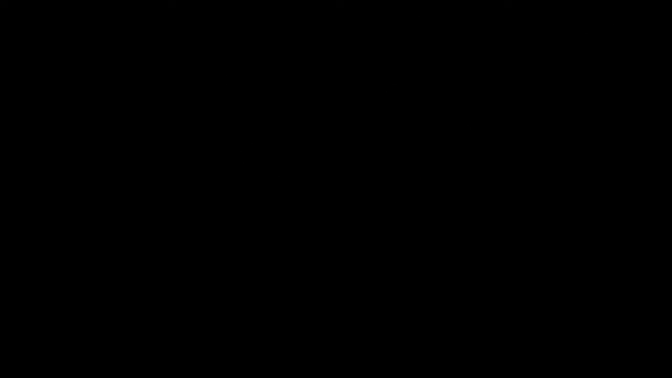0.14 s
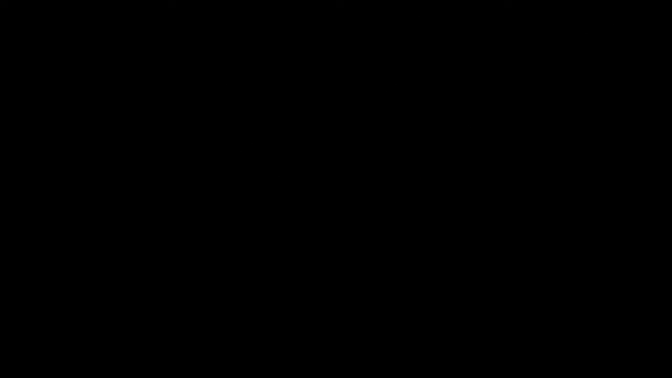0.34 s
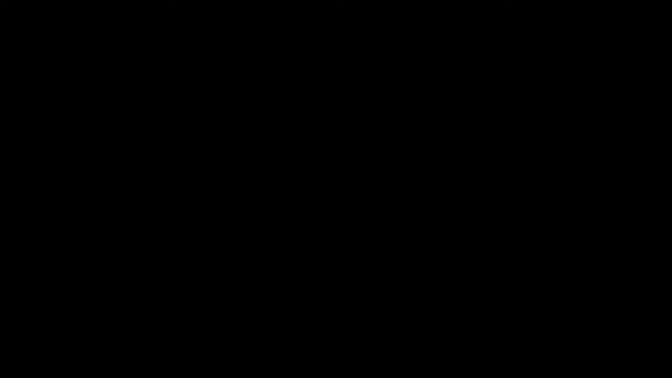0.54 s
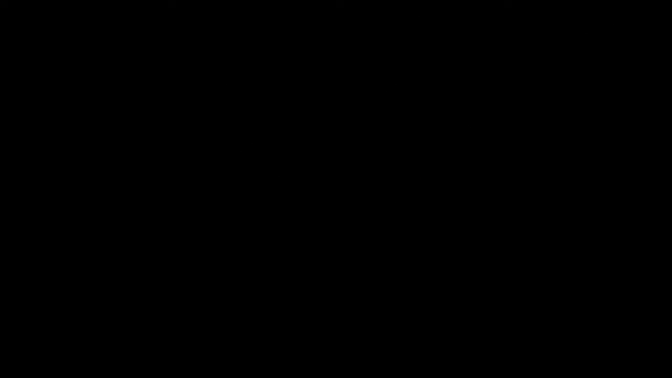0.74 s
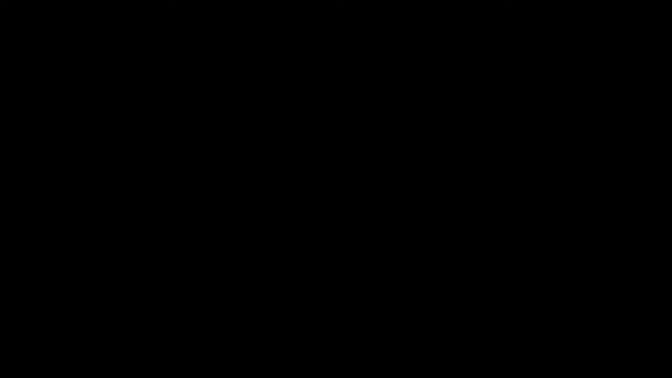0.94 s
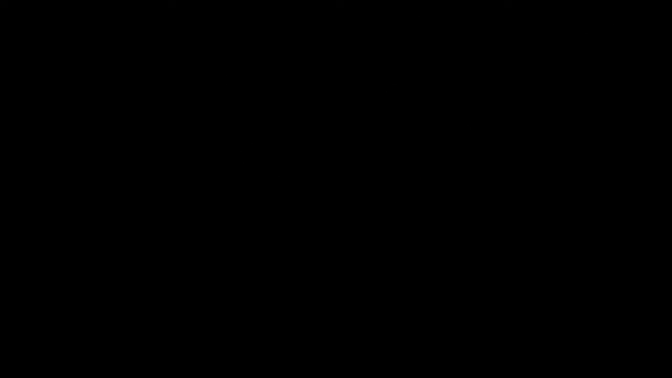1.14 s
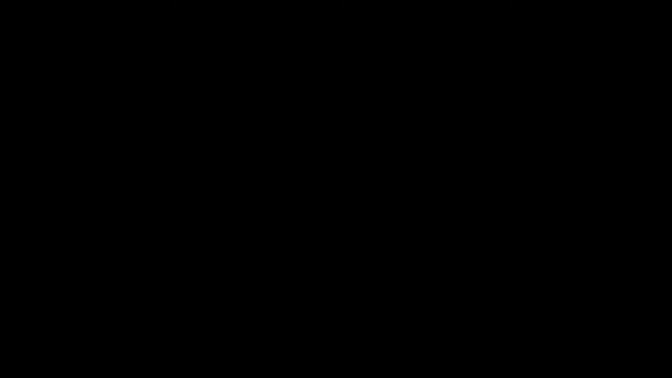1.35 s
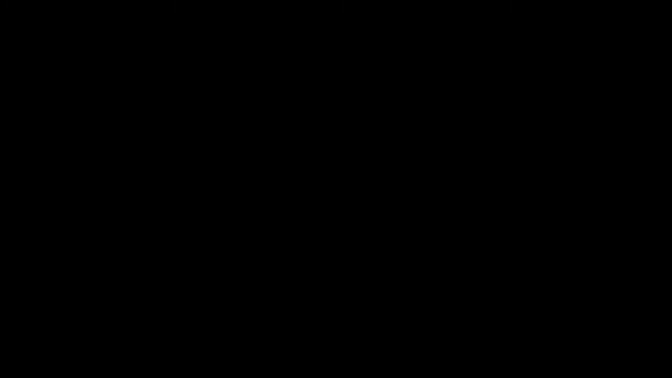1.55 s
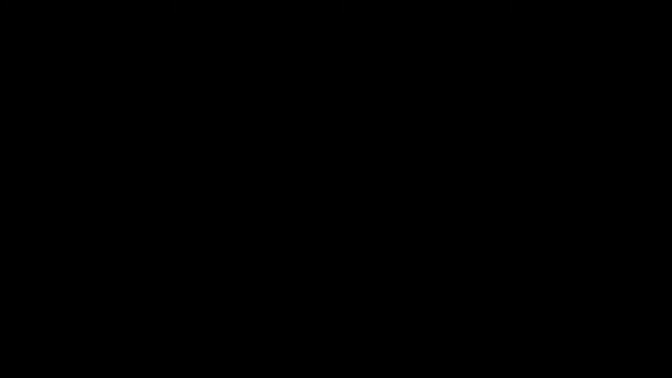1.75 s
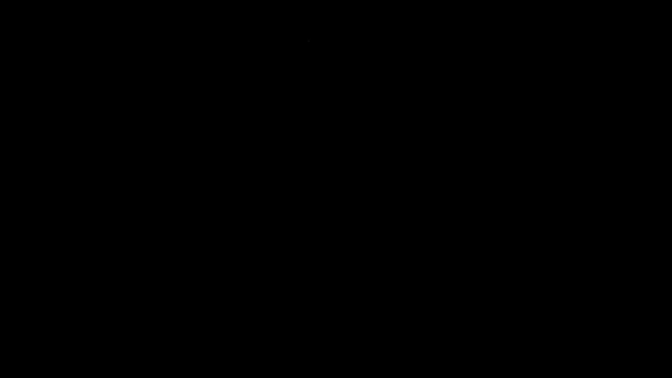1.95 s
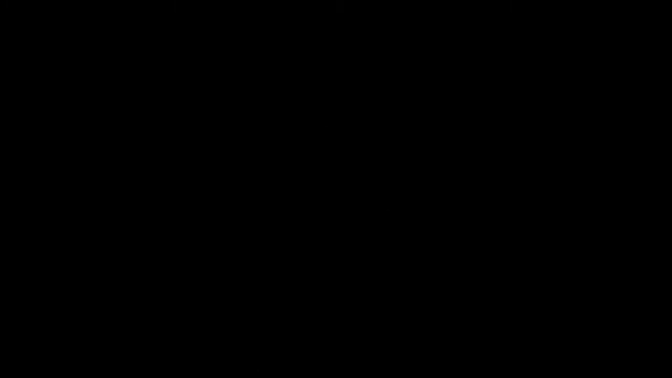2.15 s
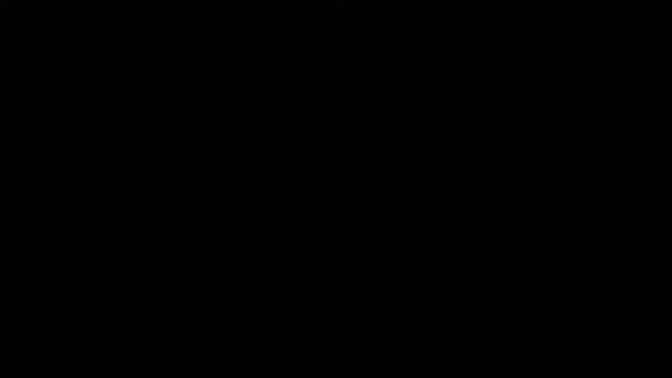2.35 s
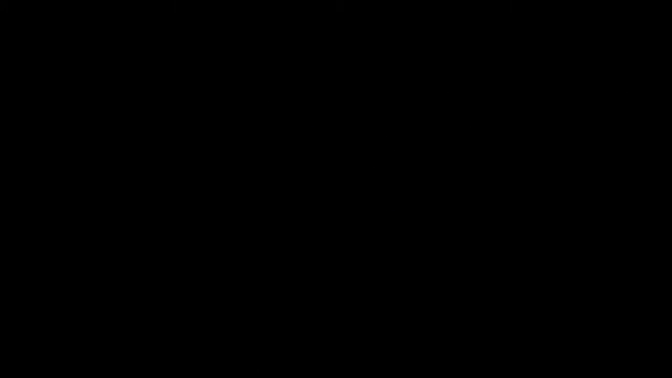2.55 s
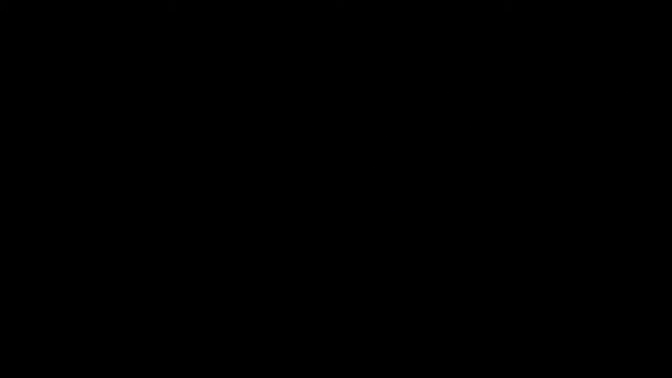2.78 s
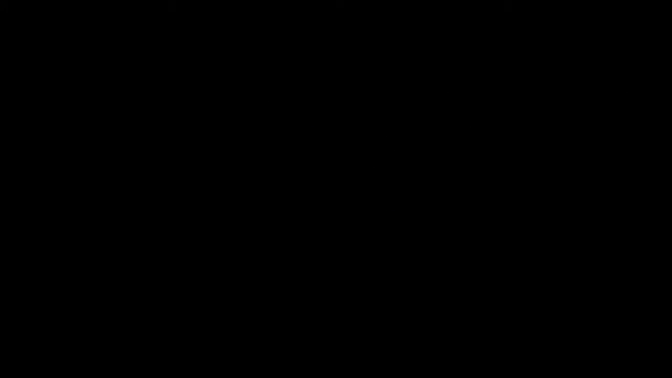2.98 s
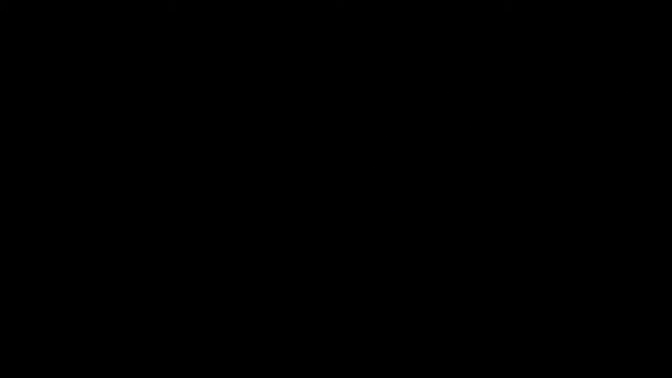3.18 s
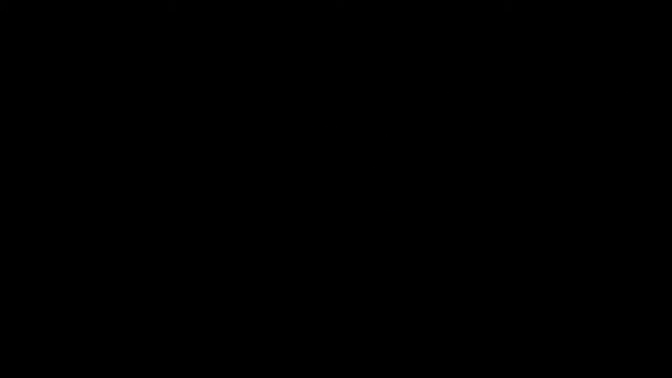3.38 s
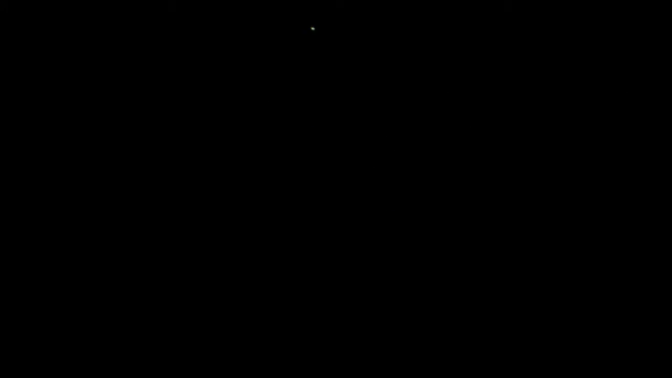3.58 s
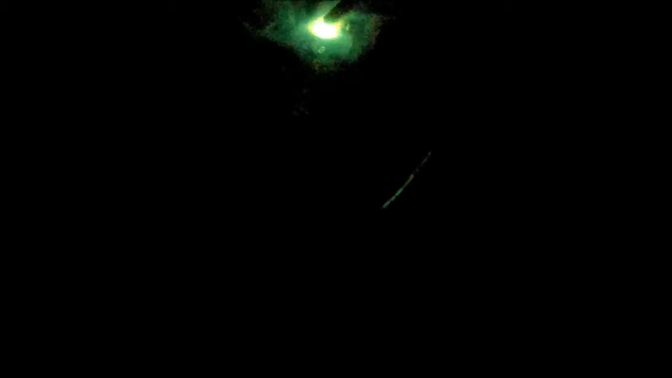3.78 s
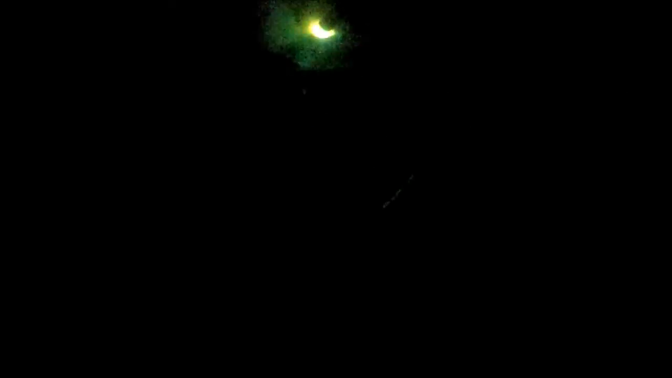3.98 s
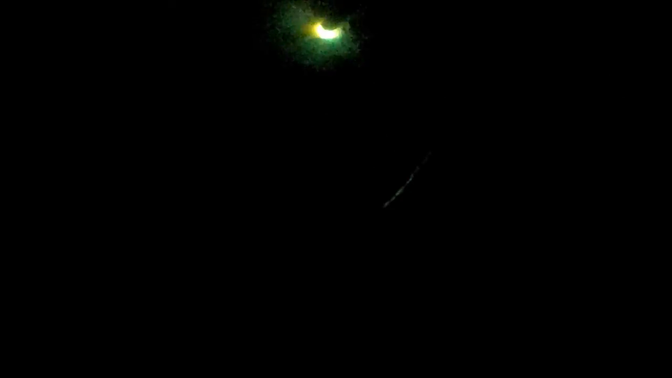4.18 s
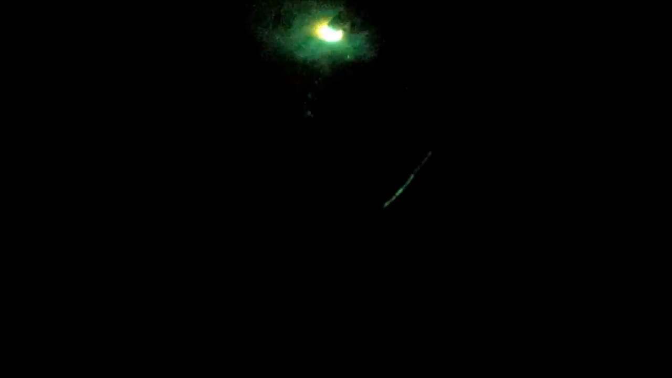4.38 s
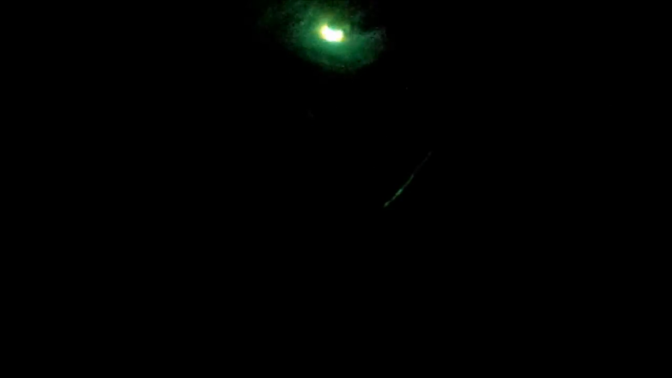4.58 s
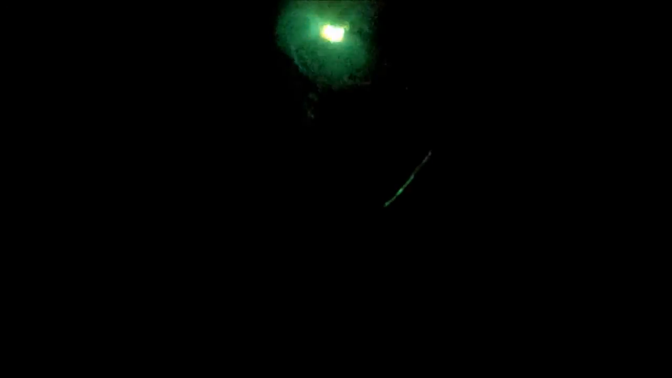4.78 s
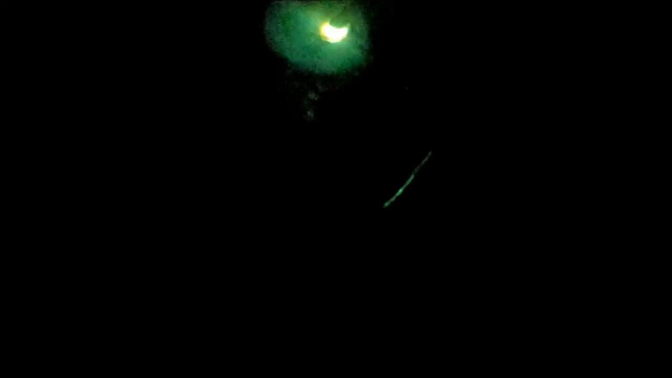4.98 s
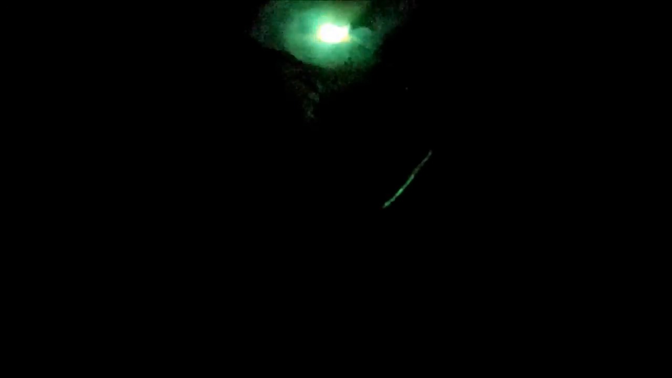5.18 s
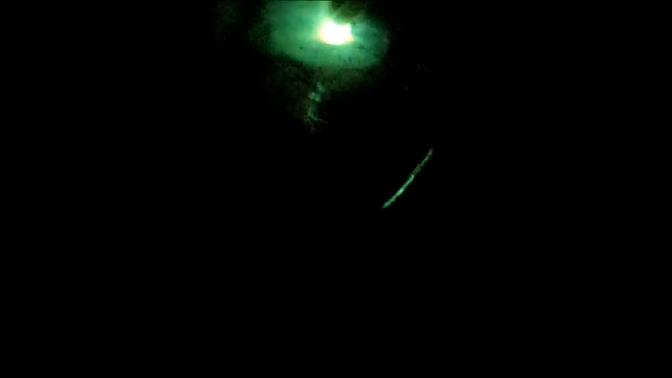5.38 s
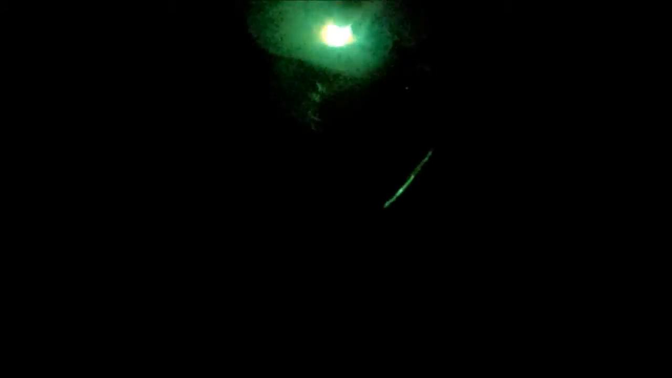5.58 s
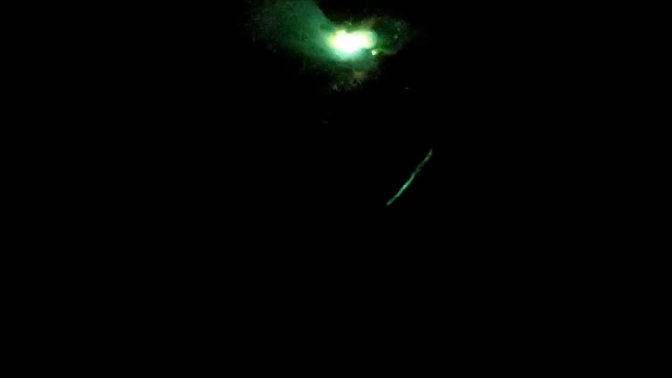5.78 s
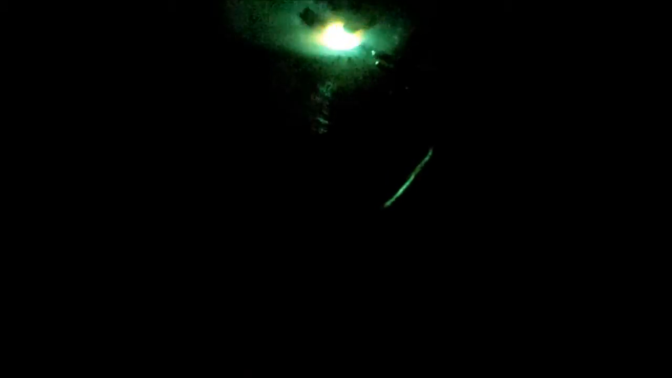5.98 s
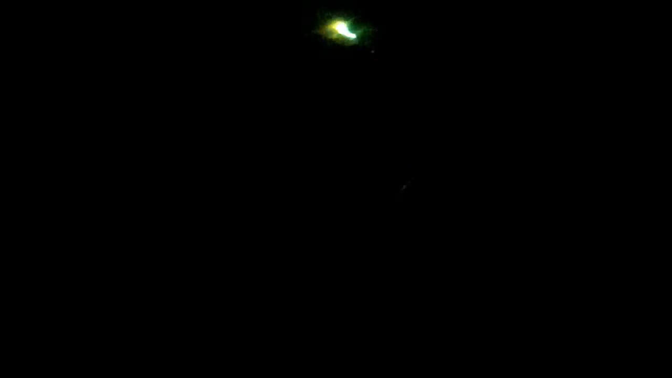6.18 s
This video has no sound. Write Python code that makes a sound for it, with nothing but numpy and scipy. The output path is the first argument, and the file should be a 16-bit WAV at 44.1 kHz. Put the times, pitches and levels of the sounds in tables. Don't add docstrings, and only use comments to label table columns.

```python
import sys
import numpy as np
from scipy import signal
from scipy.fft import rfft, irfft
from scipy.io import wavfile
from scipy.ndimage import uniform_filter1d

SR = 44100
rng = np.random.default_rng(int(sys.argv[2]) if len(sys.argv) > 2 else 0)


def linear_from_db(decibels):
    return 10 ** (np.asarray(decibels, float) / 20)


def output_pcm(signal):
    pcm = np.clip(np.atleast_2d(signal).T, -1, 1) * 32767
    wavfile.write(sys.argv[1], SR, np.round(pcm).astype(np.int16))


N = 274743
HZ = np.fft.rfftfreq(8192, 1 / SR)

# frequency in Hz, width in Hz, level in dB.
CAVITY_MODES = [(4420, 160, -15), (4570, 40, -14), (4890, 110, -14), (5240, 260, -33), (5540, 190, -24),
                (5970, 120, -8), (6280, 120, -21), (6430, 60, -24), (6880, 210, -18), (7170, 100, -25),
                (7330, 100, -14), (7850, 200, -21), (8000, 80, -25), (8450, 30, -25), (8680, 80, -29),
                (9010, 60, -30), (9560, 300, -22), (9920, 120, -24), (10260, 120, -26), (10910, 290, -24),
                (11440, 170, -31), (11840, 190, -30), (12130, 80, -22), (12430, 130, -24), (12800, 80, -25),
                (13120, 20, -36), (13640, 210, -21), (13910, 60, -35), (14440, 50, -39), (15240, 740, -25)]


def evened(x):
    return x / np.sqrt(np.mean(x ** 2) + 1e-20)


def read(points, hz):
    f, value = np.transpose(points)
    return np.interp(np.log(hz + 1), np.log(f + 1), value)


def curves(rows):
    s, *columns = np.transpose(rows)
    return [np.interp(np.arange(N) / SR, s, c) for c in columns]


def add(mix, s, sound):
    part = mix[round(s * SR):][:len(sound)]
    part += sound[:len(part)]


def hump(hz, centre_hz, width_hz):
    return 1 / (1 + (2 * (hz - centre_hz) / width_hz) ** 2)


def colour(x, gain_db):
    log_gain = np.log(linear_from_db(np.maximum(gain_db, -120)))
    circle = np.concatenate([log_gain, log_gain[-2:0:-1]])
    response = np.exp(np.conj(signal.hilbert(circle)))
    taps = np.fft.ifft(response).real[:len(gain_db)]
    return signal.oaconvolve(x, taps / np.linalg.norm(taps))[:len(x)]


def wander(rate_hz):
    hz = np.fft.rfftfreq(N, 1 / SR)
    return evened(irfft(rfft(rng.standard_normal(N)) / (1 + (hz / rate_hz) ** 4), N))


def fan():
    # frequency in Hz, density in dB per Hz.
    rush_spectrum = [(15, -49), (25, -23.5), (54, -23), (146, -20), (196, -5.5), (344, -7), (373, -6.5),
                     (462, -2.5), (691, -24.5), (749, -23.5), (1280, -34), (1910, -25.5), (2180, -33.5),
                     (3260, -34.5), (15000, -64.5)]
    # frequency in Hz,
    # width in Hz, height over the rush in dB.
    rush_resonances = [(49, 11, 8.5), (258, 16, 6.5), (658, 27, 6.5), (867.5, 27, 8.5), (1460, 5.8, 10),
                       (1653, 120, 6), (1830, 230, 2.5), (2515, 155, 10), (3244, 80, 10.5), (3720, 79, 9),
                       (4620, 65, 8.5), (4860, 43, 8)]
    # multiple of the blade tone (no unit), level in dB, wavering width in Hz.
    side_tones = [(1.247, -40, 31), (2.0, -60.5, 3.2), (.552, -42.5, 25), (.9, -55.5, 19)]
    # start in seconds, end in seconds.
    loaded = [
        (1.8, 2.22),
        (3.6, 6.3),
    ]
    rush_db, blade_db, whine_db, load_drop_db = -35.5, -38, -52.5, -6.5
    blade_hz, sag_hz_per_s = 371.6, 0.44

    humps_db = sum(db * hump(HZ, f, w) for f, w, db in rush_resonances)
    cavity_power = sum(hump(HZ, f, w) for f, w, _ in CAVITY_MODES) + 0.16
    cavity_db = 10 * np.log10(cavity_power) * (HZ > 4000)
    spectrum_db = read(rush_spectrum, HZ) + humps_db + 0.5 * cavity_db
    rush = colour(rng.standard_normal(N + len(HZ)), spectrum_db)[-N:]
    out = linear_from_db(rush_db + 0.46 * wander(5.5)) * rush

    t = np.arange(N) / SR
    turns = blade_hz * t - sag_hz_per_s * t ** 2 / 2
    out += np.sqrt(2) * linear_from_db(blade_db + 1.1 * wander(2.0)) * np.sin(2 * np.pi * turns)
    for multiple, db, width_hz in side_tones:
        waver = (wander(width_hz) + 1j * wander(width_hz)) / np.sqrt(2)
        out += np.sqrt(2) * linear_from_db(db) * (waver * np.exp(2j * np.pi * multiple * turns)).real

    load = uniform_filter1d(sum(1.0 * (t > a) * (t < b) for a, b in loaded), size=4000)
    whine_level_db = whine_db + load_drop_db * load + 1.1 * wander(1.5) + 2.0 * wander(18.0)
    whine_turns = 5 * turns + np.cumsum(wander(3.0)) * 2 / SR
    return out + np.sqrt(2) * linear_from_db(whine_level_db) * np.sin(2 * np.pi * whine_turns)


def add_scratches(body, treble):
    # start in seconds, length in seconds, level in dB, brightness in dB.
    touches = [
        (1.622, 0.0063, -36.5, 0.5),
        (1.979, 0.023, -37.5, -4.5),
        (2.019, 0.04, -37.5, 0.5),
        (2.051, 0.02, -30, -12),
        (2.684, 0.0046, -46, -1),
        (3.628, 0.0074, -36, 3),
        (3.655, 0.0049, -37, 5),
        (3.68, 0.0091, -36.5, 0),
        (3.702, 0.017, -31, 4.5),
    ]
    for s, length, db, bright_db in touches:
        t = np.arange(round((length + 0.03) * SR)) / SR
        decay = np.exp(-np.maximum(t - length, 0) / 0.0034)
        shape = linear_from_db(db) * np.minimum(t / 0.0016, 1) * decay
        add(body, s, shape)
        add(treble, s, shape * linear_from_db(bright_db - 5.0))


def knocks():
    # start in seconds, level in dB, frequency in Hz, decay time T60 in seconds.
    rings = [
        (2.067, -3.5, 190, 0.025),
        (2.0671, -15.5, 470, 0.064),
        (2.0680, -25, 700, 0.038),
        (2.062, -8, 85, 0.032),
        (1.981, -30.5, 1426, 0.06),
        (7.6, -20, 1200, 0.019),
    ]
    out, t = np.zeros(N), np.arange(5000) / SR
    for s, db, hz, t60 in rings:
        onset = np.minimum(t * hz / 1.75, 1)
        add(out, s, onset * linear_from_db(db - 60 * t / t60) * np.sin(2 * np.pi * hz * t))
    return signal.sosfilt(signal.butter(2, 35, "high", fs=SR, output="sos"), out)


def sizzle():
    # time in seconds, power in dB, brightness of the arc gap in dB.
    burn = [(3.7, -39, -3), (3.76, -25, -14), (3.8, -31.5, -15), (3.88, -30, -14), (3.95, -28.5, -10),
            (4.14, -26.5, -7.5), (4.3, -29, -9.5), (4.6, -29.5, -7), (5.0, -30, -11.5), (5.25, -29.5, -12),
            (5.45, -27.5, -17), (5.7, -30.5, -13), (6.23, -27, -11.5)]
    # start in seconds, length in seconds.
    shorts = [
        (3.978, 0.019),
        (4.106, 0.011),
        (4.24, .012),
        (4.976, 0.0076),
        (5.304, 0.013),
        (6.21, 0.015),
    ]
    short_db, roar_db, roar_follow = -9.5, -31, 0.75

    sizzle_db, bright_db = curves(burn)
    lit = uniform_filter1d(1.0 * (np.arange(N) / SR > burn[0][0] + 0.012), size=400)
    for s, length in shorts:
        dip = signal.windows.tukey(round((length + 0.0033) * SR), 0.3)
        add(lit, s - 0.002, (linear_from_db(short_db) - 1) * dip)

    drops = linear_from_db(3.6 * np.minimum(rng.exponential(1, N), 3.5)) * (rng.random(N) < 150 / SR)
    drops = signal.oaconvolve(drops, signal.windows.gaussian(400, 0.00045 * SR), "same")
    flutter_db = 1.4 * wander(28.0) + 2.7 * wander(120.0)
    flicker = evened(linear_from_db(flutter_db) * (5.2 + drops))

    body = lit * linear_from_db(sizzle_db) * flicker
    treble = lit * linear_from_db(sizzle_db + bright_db + 4.5 + 2.15 * wander(93.0)) * flicker
    follow_db = roar_follow * (sizzle_db - sizzle_db[-1] + 1.5)
    thump = lit * linear_from_db(roar_db + follow_db + 2.0 * wander(32.0))
    return body, treble, thump, bright_db


def spatter():
    # time in seconds, peak level in dB.
    large_pops = [(3.7204, -8.5), (3.7324, -8.5), (3.7708, -6.5), (3.8674, -13), (3.8756, -1),
                  (3.9604, -11.5), (3.9938, -6), (4.0188, -12.5), (4.0537, -1), (4.1155, -13),
                  (4.1884, -8.5), (4.2872, -14), (4.3296, -9), (4.36, -9), (4.5027, -10.5), (4.6563, -9.5),
                  (4.9267, -12.5), (4.9841, 0), (5.23, -8.5), (5.3253, -3.5), (5.3453, -7), (5.4909, -11.5),
                  (5.5094, -14), (5.5807, -10), (5.6206, -10.5), (5.7084, -10.5), (6.107, -2.5),
                  (6.1124, -11), (6.1639, -13), (6.2254, -8.5)]
    settled_s, slot_s, small_db, spread_db = 4.07, 0.065, -15.5, 1
    slots = np.arange(settled_s, N / SR - slot_s, slot_s)
    place, size = rng.random((len(slots), 2)).T
    small_pops = zip(slots + place * slot_s, small_db + spread_db * (2 * size - 1))
    return list(large_pops) + list(small_pops)


def add_pops(body, treble, thump, bright_db):
    ms = np.arange(1500) * 1000 / SR
    for s, db in spatter():
        gap_bright_db = max(bright_db[round(s * SR)], -20)
        pop_bright_db = -10 - 0.32 * db + 0.7 * gap_bright_db
        rise_ms = 0.068 * linear_from_db(-0.9 * db)
        crack = np.minimum(ms / rise_ms, 1) * np.exp(-np.maximum(ms - rise_ms, 0) / 1.64)
        size = max(linear_from_db(db) - linear_from_db(-20), 0)
        add(body, s, size * linear_from_db(-2.5) * crack)
        add(treble, s, size * linear_from_db(pop_bright_db + 10.5) * crack ** 1.1)
        add(thump, s, size * linear_from_db(-11.0) * crack)


def helmet_db():
    # frequency in Hz, width in Hz, level in dB.
    shell = [(1130, 20, -23), (1330, 50, -35), (1690, 30, -28), (1750, 50, -8), (1880, 110, -11),
             (2060, 200, -25), (2260, 130, -23), (2580, 20, -10), (2770, 130, -7), (3050, 60, -8),
             (3150, 130, -12), (3440, 130, -24), (3590, 90, -20), (3710, 190, -19), (3980, 140, -22)]
    # frequency in Hz, width in Hz, level in dB.
    further_modes = [
        (6945, 40, -20),
        (8110, 110, -19),
        (8760, 40, -29),
        (10360, 60, -27),
        (12900, 60, -28),
    ]
    modes = sum(linear_from_db(db) / (1 + 2j * (HZ - f) / w) for f, w, db in [*shell, *CAVITY_MODES, *further_modes])
    low_cut = 1 / (1 + (1280 / (HZ + 1)) ** 6)
    return 10 * np.log10((abs(modes) ** 2 + linear_from_db(-76)) * low_cut)


def echoes(x, db, t60, start_s):
    t, turn = np.arange(SR // 2) / SR, np.arange(N) / SR * 9.0
    shape = linear_from_db(-60 * t / t60) * (t > start_s)
    windows = [np.sqrt(2 / 3) * np.cos(np.pi * (turn + k / 3)) for k in range(3)]
    tails = rng.standard_normal((3, len(t))) * shape / np.linalg.norm(shape)
    return linear_from_db(db) * sum(signal.oaconvolve(x * w, tail)[:N] for w, tail in zip(windows, tails))


def arc():
    # frequency in Hz, density in dB per Hz.
    roar_spectrum = [(18, -33), (30, -38), (107, -16), (145, -19), (199, -17.5), (340, -7), (361, -6.5),
                     (454, 1.5), (533, -15.5), (681, -11), (950, -35.5), (1240, -41), (2090, -120)]
    body, treble, thump, bright_db = sizzle()
    add_scratches(body, treble)
    add_pops(body, treble, thump, bright_db)

    fizz = rng.choice([-1.0, 1.0], N)
    out = linear_from_db(-1.0) * colour(thump * rng.standard_normal(N), read(roar_spectrum, HZ))
    shell_db = helmet_db()
    low_db = -10 * np.log10(1 + (HZ / 8000) ** 8) + 0.5 * np.log2(1 + HZ / 6000)
    high_db = -10 * np.log10(1 + (8000 / (HZ + 1)) ** 8)
    for envelope, band_db, walls_db in ((body, low_db, -22), (treble, high_db, -16)):
        direct = envelope * fizz
        bench = echoes(direct, -10, 0.065, 0.0016)
        out += colour(direct + bench, shell_db + band_db)
        walls = echoes(direct, walls_db, 0.43, 0.01)
        out += colour(walls, 0.42 * shell_db + band_db)
    return out


def scene():
    return (fan() + arc() + knocks())[None]


def top_cut(x):
    return signal.sosfilt(signal.butter(12, 16650, fs=SR, output="sos"), x)


def record(dry):
    skirt_hz = [15400, 15800, 16600]
    edge_db = np.array([0, 0, -26, -42, -44, -70])
    edge = signal.firwin2(511, [0, 15230, *skirt_hz, SR / 2], linear_from_db(edge_db), fs=SR)
    limited = signal.oaconvolve(dry, edge[None], "same")
    return top_cut(1.235 * np.tanh(limited / 1.177))


dry = scene()
out = record(dry)
output_pcm(out)
```